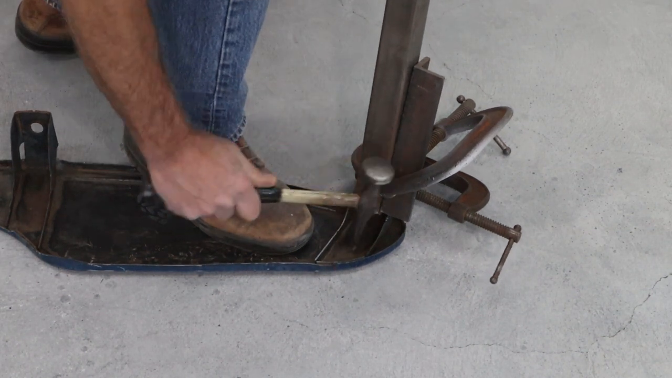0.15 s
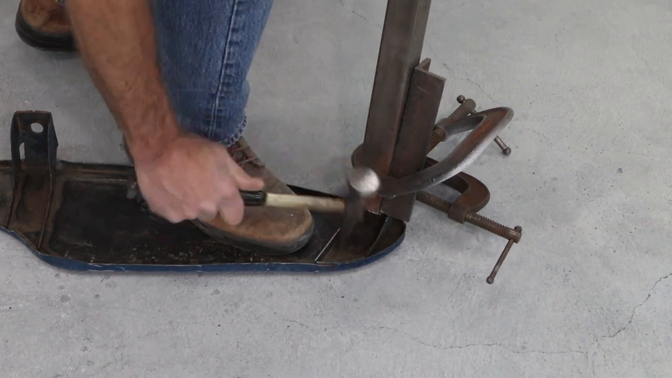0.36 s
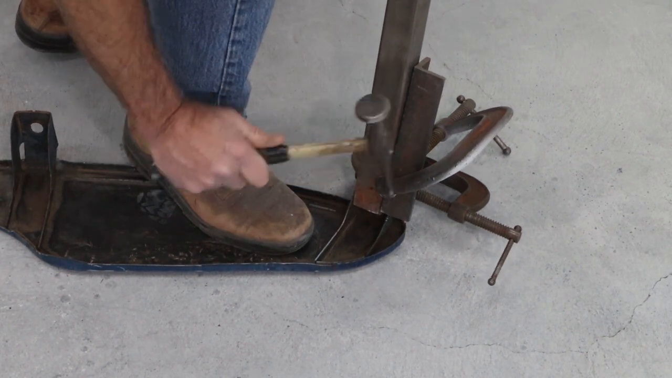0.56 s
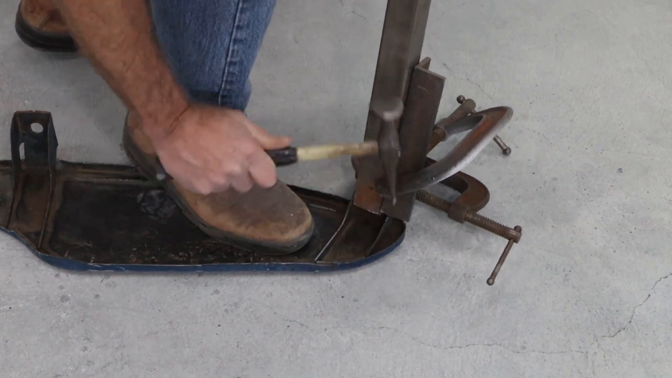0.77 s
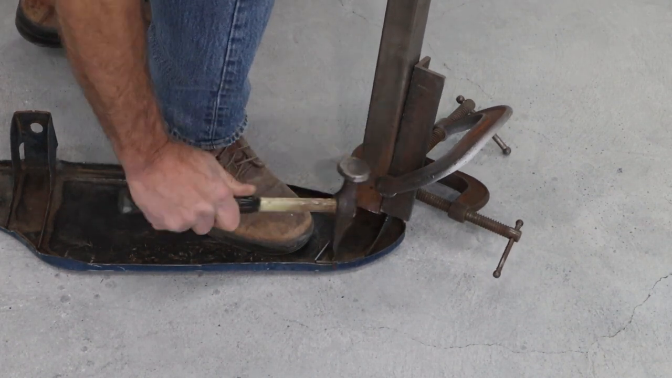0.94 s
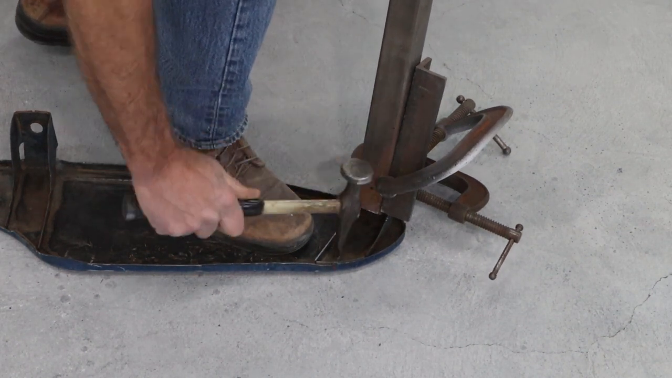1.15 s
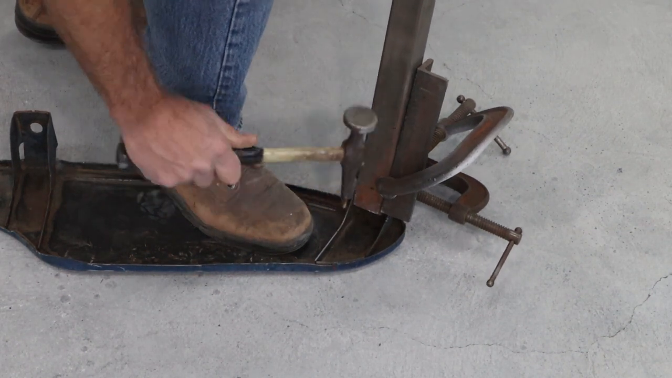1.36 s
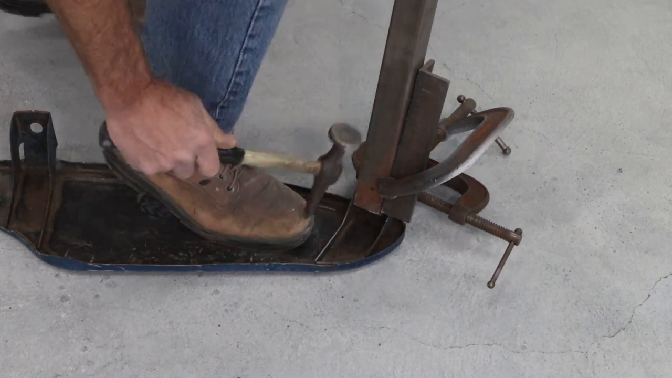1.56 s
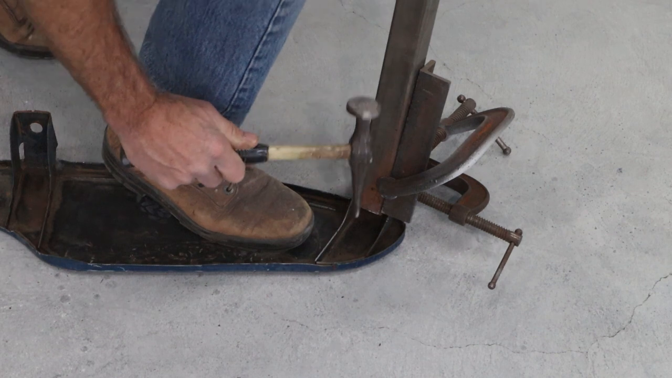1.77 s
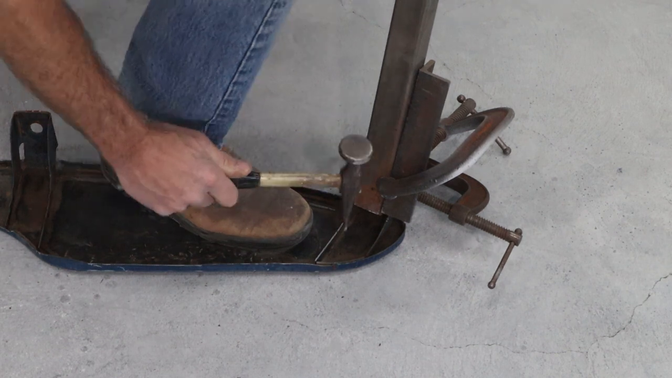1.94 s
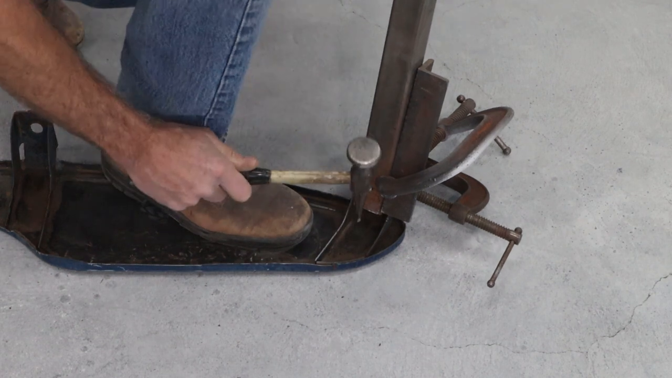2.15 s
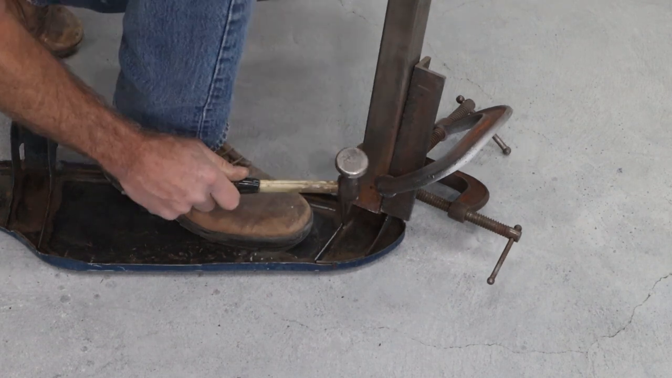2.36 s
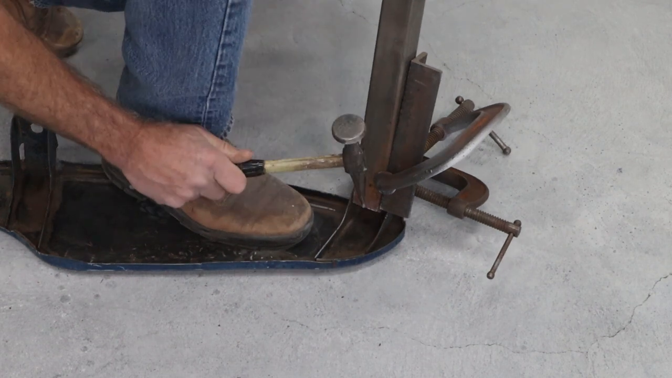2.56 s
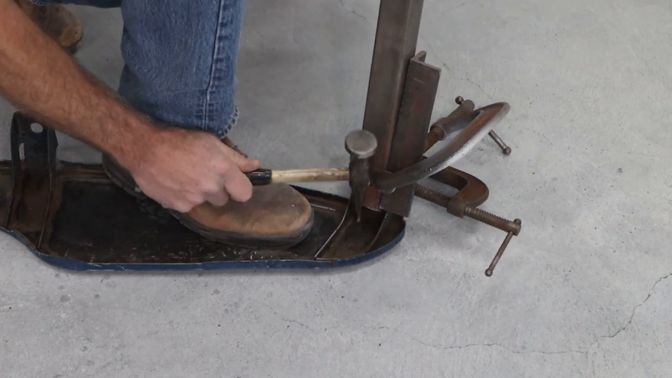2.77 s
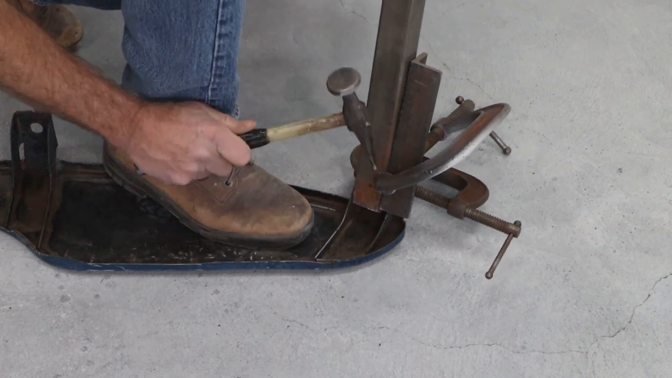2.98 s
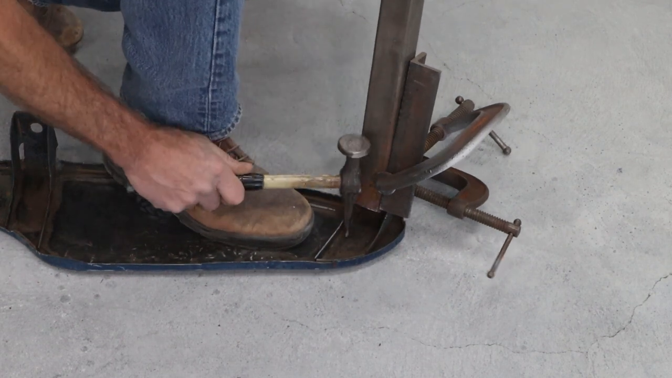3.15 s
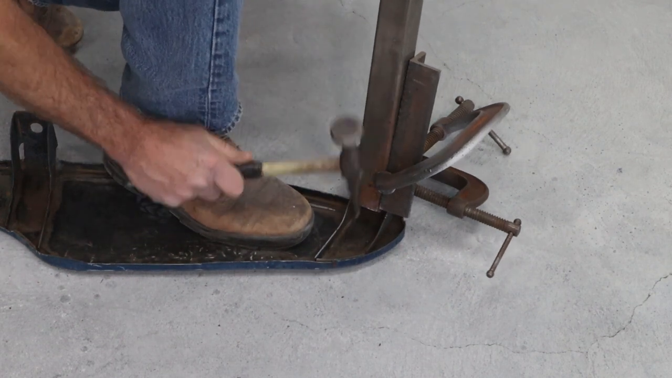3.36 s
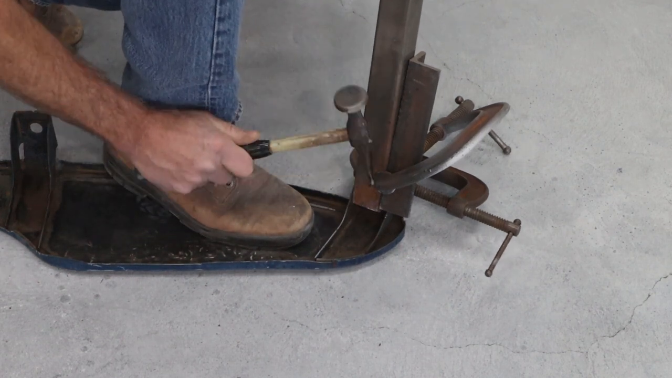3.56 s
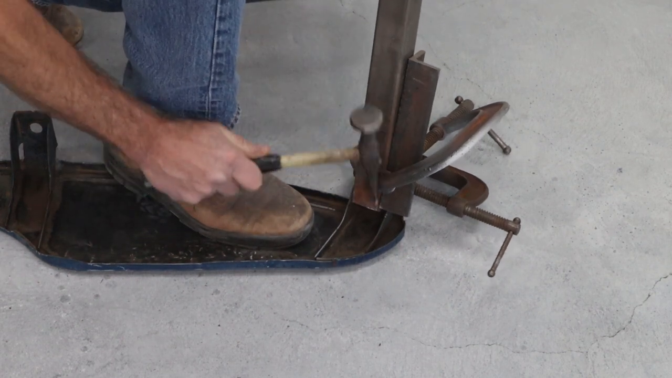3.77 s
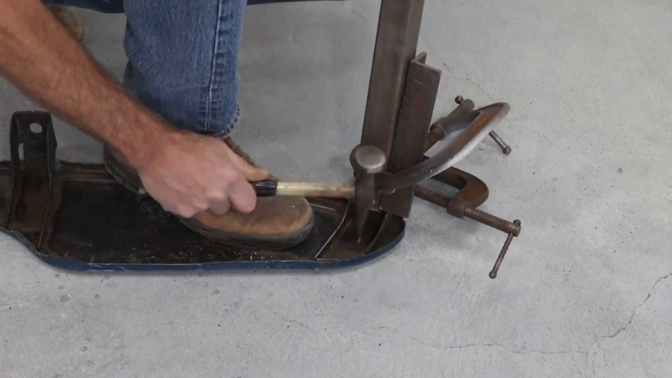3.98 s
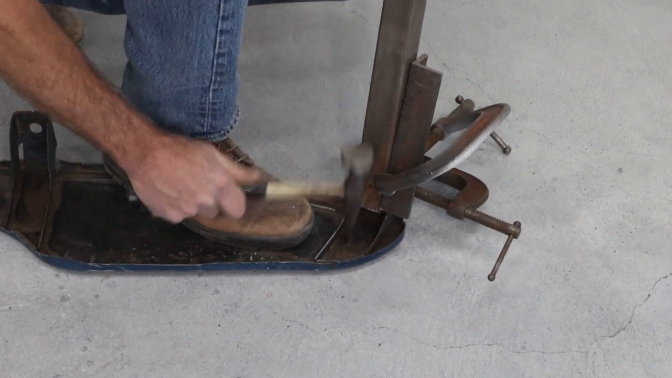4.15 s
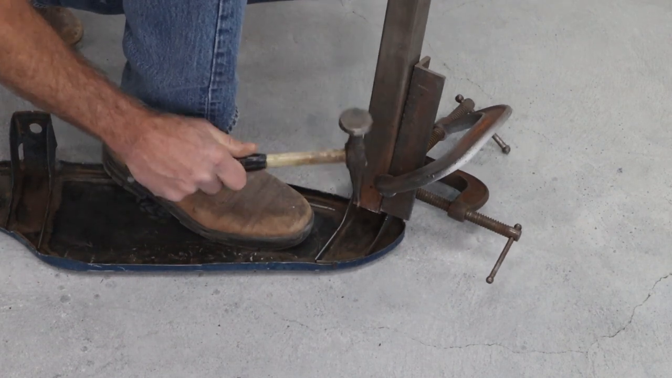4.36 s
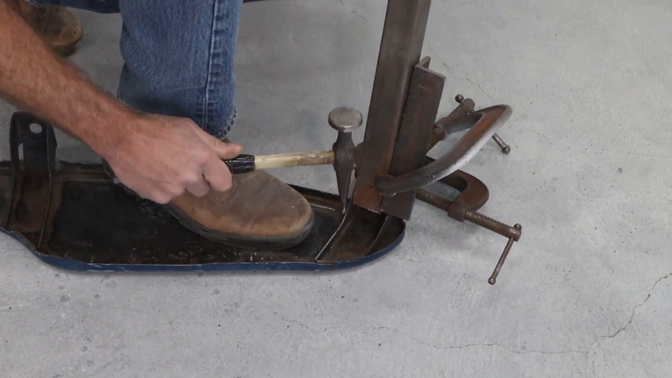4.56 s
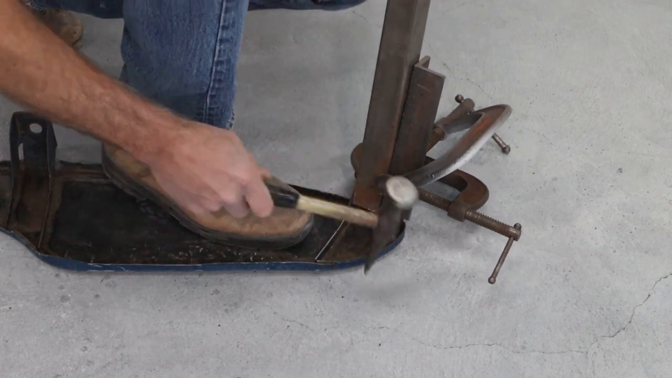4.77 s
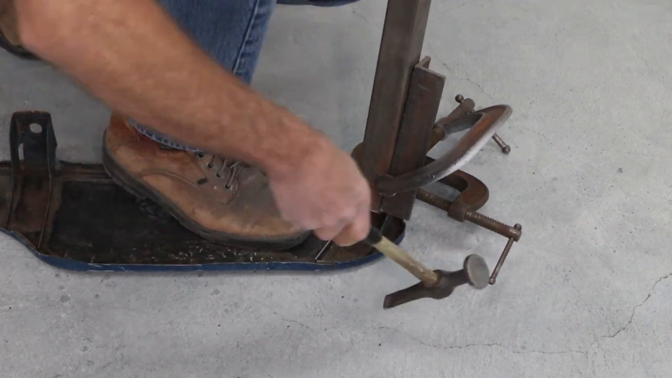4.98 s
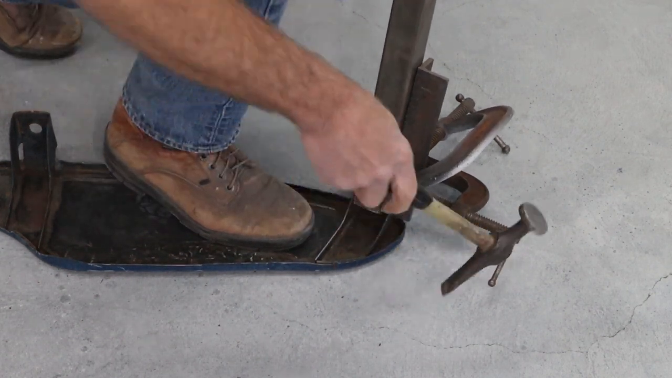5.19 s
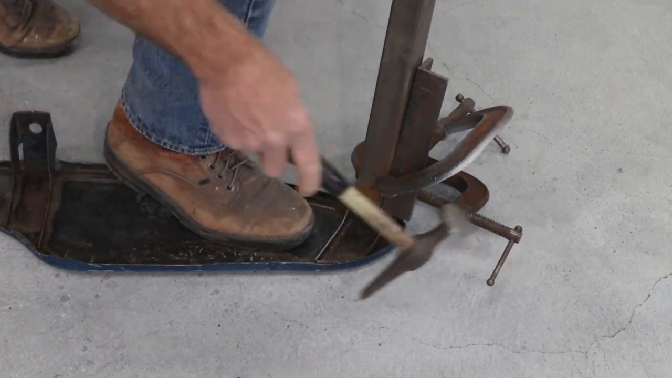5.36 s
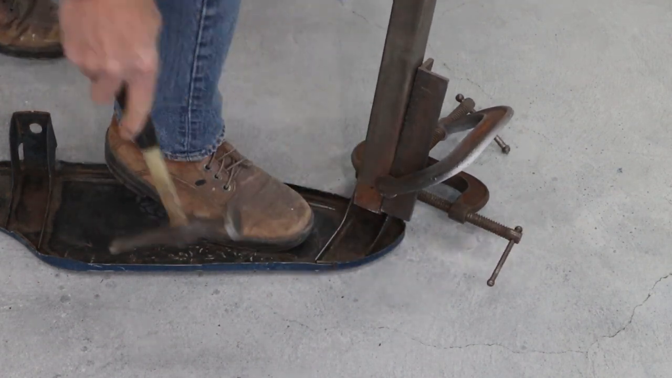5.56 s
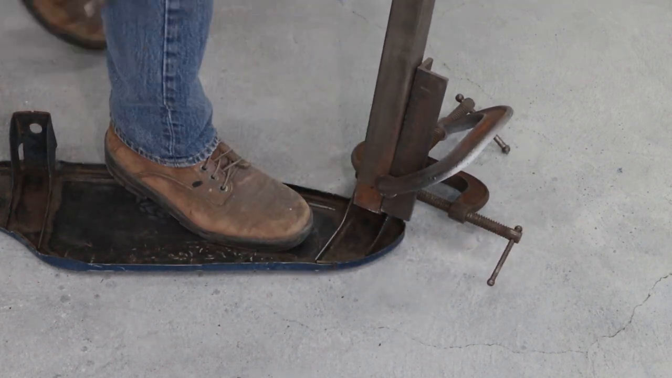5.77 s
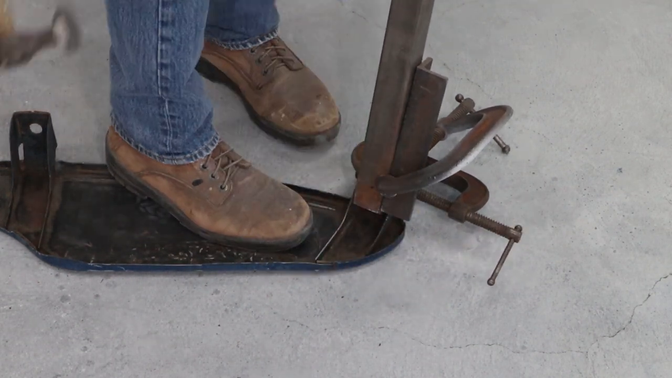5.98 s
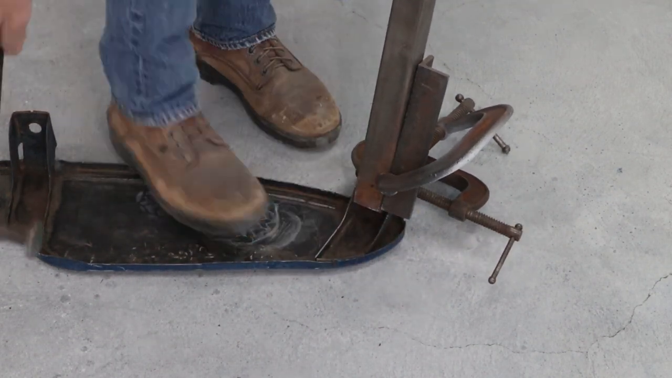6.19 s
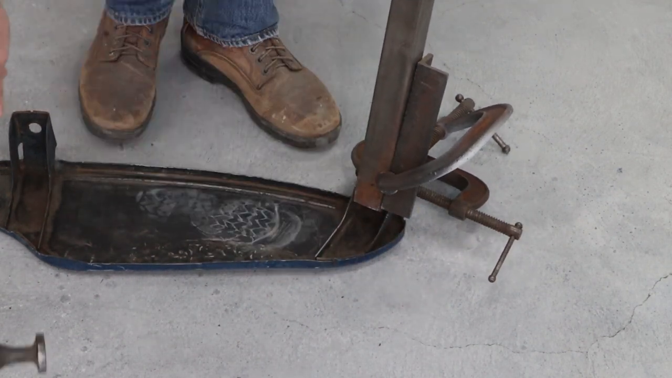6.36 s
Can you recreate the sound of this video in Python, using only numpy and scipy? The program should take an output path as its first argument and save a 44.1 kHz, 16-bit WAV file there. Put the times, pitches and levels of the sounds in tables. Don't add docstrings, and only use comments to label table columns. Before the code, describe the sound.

A hand hammer cracks loudly against sheet steel in two short runs, light taps between, then boots knock and scrape away.

```python
import sys
import numpy as np
from scipy import signal
from scipy.fft import rfft, irfft
from scipy.io import wavfile
from scipy.ndimage import uniform_filter1d

SR = 44100
rng = np.random.default_rng(int(sys.argv[2]) if len(sys.argv) > 2 else 0)


def unload_audio(sound):
    columns = np.transpose(np.atleast_2d(sound))
    steps = np.round(np.clip(columns, -1, 1) * 32767)
    wavfile.write(sys.argv[1], SR, steps.astype(np.int16))


def decibels_to_gain(level_db):
    exponent = np.asarray(level_db, float) / 20
    return 10 ** exponent


N = 283424
LEAD = 4410

# t/s, peak level/dB, mids level/dB, level sent to the room/dB, bending level/dB
FIRST_BLOWS = [
    (0.17, 2, -9, -1, -3),
    (0.1941, -4, -8.5, 3.5, -8),
    (0.4512, -0.5, -4, 2, -8),
    (0.4996, -18, -14, 13, 9.5),
]
FIRST_BLOWS_END = [
    (0.7202, -1.5, -3, 3.5, -0.5),
    (0.8444, -24.5, -6.5, -5, 0),
    (0.9637, -1, -6.5, 2, -2.5),
    (1.2142, -3.5, -4.5, 2.5, -2.5),
]
TOUCHES = [
    (2.301, -56.5, -1.5, -1, -0.5),
    (2.3264, -22, 0, -2, -2),
    (2.333, -32, -5.5, 11.5, -5.5),
    (2.35, -36, 1, 2, -4.5),
    (2.3933, -23, -3, 1.5, 3.5),
    (2.399, -25, -12.5, 4.5, -0.5),
    (2.406, -30.5, -6.5, 3, 1.3),
    (2.4279, -32.5, -11.5, -3.5, -1),
    (2.434, -36, -14, -4, 3),
    (2.5698, -26.5, -6.5, 3.5, 5),
]
OPENING_BLOW = [
    (2.7699, 0.5, -12.5, -1, 0),
]
DOUBLE_BLOW = [
    (3.169, -7.5, -8.5, 0, -10.5),
    (3.1799, 3.5, -11, 0.6, 0),
]
SECOND_BLOWS_END = [
    (3.4794, 4, -8, 0.5, 5),
    (3.7421, -0.5, -12, 3.5, 2),
    (4.0056, 1, -8, 1.6, 2.5),
    (4.253, -1, -12.5, 0.9, -0.5),
]
EARLIER_BLOW = (2, -5, 2.5, 2.4)

# lows, mids, highs level/dB
USUAL_COLOUR_DB = (-24.5, -9, -18.5)
# f/Hz, level/dB per Hz
FIRST_CRACK = [(24, -71), (40, -37), (176, -19.5), (226, -24), (297, -11), (412, -12.5), (467, -8),
               (1850, -8.5), (2260, -3), (3740, -3.5), (5050, 2), (16000, -42.5)]
NEXT_CRACK = [(24, -74), (40, -49.5), (54, -57.5), (171, -20.5), (412, -11.5), (585, -4.5), (1150, -8),
              (1300, -3.5), (2150, -16), (3140, -7), (5050, 6), (16000, -53)]
TOUCH_CRACK = [(180, -44), (300, -3.5), (537, -19.5), (1010, -18.5), (1460, -5), (1900, -4), (3700, -4.5),
               (5250, 4.5), (6410, -9.5), (16000, -58)]
SECOND_CRACK = [(59, -61), (100, -30), (224, -29.5), (295, -24.5), (513, -13.5), (621, -17.5), (818, -6.5),
                (1800, -8), (2800, -0.5), (3700, -3.5), (5420, -3.5), (6020, -7.5), (16000, -44)]
LAST_CRACK = [(24, -57), (40, -28.5), (220, -28), (297, -19), (630, -11), (810, -6), (896, -7.5),
              (1520, -4.5), (1760, -8.5), (2770, -1), (5310, -1), (16000, -43.5)]
# f/Hz, level/dB per Hz
CONTACT_COLOUR = [(180, -51), (300, -19), (565, -8.5), (1780, -10.5), (2030, -2), (2520, -19), (2840, -1),
                  (3350, -10.5), (3760, -10.5), (5520, -5.5), (6620, -7), (10600, -19), (14500, -33),
                  (16000, -28)]
# f/Hz,
# level/dB, T60/s
FIRST_BENDING = [(93, -34.5, 0.018), (175, -53.5, 0.75), (312, -48, 0.34)]
SECOND_BENDING = [(75.2, -35, 0.025), (307.7, -53.5, 0.32), (525, -52, 0.28), (830, -46.5, .4),
                  (1015, -45, .4)]
TOUCH_BENDING = [(1270, -40, 0.3045)]

SPOT_FROM_S = [-1, .1, .4, .7, .9, 1.2, 2.2, 2.38, 2.55, 2.7, 3.1, 3.4, 3.7, 3.95, 4.2]
SPOT_BRIGHT_DB = [0.8, -3, -2.5, 1.5, 4.5, 0.55, 4.5, -6.5, 0, -2.5, -0.4, 0.1, 1.4, 2.1, 2.5]
# f/Hz, width/Hz, level/dB
FIRST_SPOTS = [
    [(1650, 53, -9), (2305, 390, -4.5), (3510, 160, -5.5), (4020, 42, -0.5), (4700, 56, 2.5),
     (5020, 110, -0.5), (6200, 78, -6), (6600, 67, -4.5)],
    [(1540, 68, -6), (2290, 49, -3.5), (3400, 95, 0), (4000, 56, -4.5), (4400, 150, -4), (4700, 74, -8),
     (5070, 54, -1), (5100, 36, -3), (5510, 20, -12), (6400, 41, -14)],
    [(2120, 56, -4.5), (2800, 61, -3), (3540, 65, -2), (3900, 80, -4), (4400, 49, -4), (4830, 41, 1),
     (5222, 60, 2), (5610, 22, -6.5), (6240, 35, -10.5), (6680, 140, -12.5)],
    [(1010, 22, -6), (2160, 51, -2.5), (2420, 51, -5), (3340, 91, -5.5), (4018, 120, -7), (4710, 27, -4),
     (5400, 44, -1), (5404, 30, -5), (5520, 32, -3), (5500, 26, -4.5)],
    [(566, 220, -13), (1590, 33, 3.5), (2000, 22, -4), (2107, 49, -3), (2820, 100, -4), (3480, 87, -5.5),
     (3780, 59, -11), (4600, 26, -4), (5370, 66, -1), (6840, 120, -9)],
    [(577, 36, -13), (866, 20, -11), (1580, 68, -9), (2180, 73, -6), (2880, 230, -13), (3870, 51, -8.5),
     (5100, 66.2, 2), (6250, 220, -12.5), (6470, 14, -16.5), (6660, 23, -15.5)],
]
TOUCH_SPOTS = [
    [(2070, 48, -10.5), (2600, 39, 0), (3310, 62, -5.5), (4870, 27, -5), (5100, 30, 4), (5290, 15, -1),
     (5590, 31, -5), (6120, 32, -5.5), (6520, 49, -12), (7320, 120, -13.5)],
    [(969, 120, -3.5), (1270, 36, -16), (1850, 130, -6.5), (3330, 49, -5.5), (4130, 75, -2), (4750, 41, 1),
     (5100, 26, 5), (5250, 51, -3.5), (5600, 150, -1.5), (6750, 54, -5.5)],
    [(1250, 25, -3), (2060, 37, -1), (2570, 33, 6.5), (3390, 34, 0), (4130, 54, -4), (4400, 110, -5),
     (5300, 120, 0), (5530, 57, 3.5), (6103, 40, 6), (7950, 170, -10)],
]
SECOND_SPOTS = [
    [(793, 26, -6.5), (1045, 63, -6), (1693, 46, -13), (2050, 51, 3.5), (2790, 48, -1), (3360, 70, 0.5),
     (3707, 21, -14.5), (4127, 342, -4), (4470, 66, -4.5), (4840, 21.1, -6), (5180, 110, -4.5),
     (5530, 33, -3), (6210, 26, -15.5), (6480, 37.3, -12.5)],
    [(787, 26, -8), (1030, 56, -5), (1288, 26, -7), (1510, 90, -4.5), (1880, 26.9, -9.5), (2126, 63, -9.5),
     (2840, 88, 1.5), (3230, 58, -3.5), (4040, 68, -9.5), (4080, 130, -1.5), (4727, 150, -8.5),
     (5300, 120, 3), (5700, 67, -0.5), (6270, 43, -10)],
    [(820, 44, -7.5), (1000, 60, -5), (1290, 24.7, -8.5), (2140, 79, -3), (2963, 77, -6.5), (3430, 35, -2),
     (4170, 91, -6.5), (4570, 27, -8), (4800, 59, -8), (5065, 29, -7), (5165, 60, -5.5), (5530, 96, -2),
     (6045, 32, -1.5)],
]
LAST_SPOTS = [
    [(1263, 36, -2.5), (1630, 142, -8.5), (2075, 34, -1), (2155, 190, -7), (2790, 57, 3), (3220, 45, -2),
     (3940, 200, -2), (4890, 46, -3.5), (5230, 43, -1.5), (5600, 24, -4.5), (6180, 55, -25),
     (6760, 130, -11.5), (7025, 37, -10)],
    [(753, 62, -7.5), (1022, 47, -3), (1406, 63, -16.5), (2870, 71, -9), (3467, 100, 0.5), (4100, 68, 0),
     (4400, 31, -6.5), (4730, 63, -3.5), (5540, 75, 0), (6520, 210, -17.5), (6880, 132, -15.5)],
    [(500, 57, -7.5), (732, 150, -10), (1040, 46.2, -5), (1274, 26, -19), (1552, 71, -3.5),
     (2500, 370, -0.5), (2910, 41, -1), (3300, 110, -3.5), (3730, 100, -1.5), (4135, 290, -1),
     (5015, 20, -2.5), (5380, 180, -2.5), (5700, 27, 0), (6250, 28, -9)],
]
# f/Hz, width/Hz, level/dB
HIGH_MODES = [(7600, 300, -19), (8500, 510, -19), (9474, 710, -21), (10360, 400, -26.5)]
# f/Hz, width/Hz, level/dB
FIRST_RINGS = [
    [],
    [(1540, 59, -8), (2320, 240, -4.5), (2600, 110, -6.5), (3360, 88, -4.5), (5360, 51, -1.5)],
    [(2633, 130, -3), (3860, 150, -4.5), (4660, 38, 1), (5200, 91, -2.5), (6300, 83, -14.5)],
    [(1950, 200, -7), (2640, 250, -3), (3360, 92, -0.5), (4692, 120, 1), (5700, 140, 4)],
    [(2128, 84, -3), (2790, 150, -6), (4700, 130, 1.5), (5200, 220, -2), (5400, 130, 0), (6250, 200, -6)],
    [(2039, 61, -6.5), (2800, 74, -5), (4720, 110, -0.5), (5100, 250, -2), (5560, 160, 0)],
    [(3370, 96, 0), (5120, 150, 11.5), (5840, 140, 3), (7030, 140, -1)],
    [(1826, 79, -2), (2850, 95, -8), (3340, 110, -12), (5240, 270, 3)],
    [(2580, 110, -1), (3350, 100, -12), (4150, 150, -8), (5280, 150, 6)],
]
SECOND_RINGS = [
    [(2190, 430, -9.5), (2830, 170, 2.5), (3200, 190, 5.5), (4250, 140, -2.5), (5330, 400, 1.5)],
    [(2830, 190, 3), (3140, 250, -1), (4287, 250, -15), (5240, 120, -0.5), (5527, 250, 3.5)],
    [(2250, 56, -12), (2830, 97, -2.5), (3310, 130, 2.5), (5552, 370, 1), (6050, 190, -9.5)],
    [(2900, 150, 4.5), (3170, 140, -2), (4300, 170, -5), (5700, 120, -5.5), (5270, 130, 0)],
    [(3300, 200, 0), (5100, 180, -1.5), (5680, 200, 0.5), (6273, 110, -8), (6960, 110, -13.5)],
    [(2350, 200, -10), (2878, 155, 3.5), (3320, 178, -1.5), (4900, 200, -4), (5530, 170, 7)],
]

# t/s, peak level/dB, f/Hz, T60/s
CLINKS = [
    (0.2797, -14.5, 2302, 0.04),
    (0.318, -14, 2290, 0.053),
    (0.8454, -9, 2600, 0.033),
    (1.2348, -8, 2790, 0.035),
]
CLINK_PARTIALS = [(0.59, .3), (.82, 0.19), (1.65, 0.2), (2.1, 0.39), (2.03, 0.29)]

# f/Hz, T60/s
ROOM_T60 = [(100, 0.63), (300, 0.95), (800, 0.75), (2000, 0.83), (5000, 0.6), (8000, 0.43), (13000, 0.28)]
# f/Hz, level/dB
ROOM_COLOUR = [(60, -15.5), (200, -5.5), (600, 6.5), (2000, -1), (6000, 1.5), (15000, 6.5)]

# t/s, peak level/dB, thud f/Hz, relative snap level/dB
KNOCKS = [(1.71, -50.5, 933, 9.5), (1.836, -56, 121, -3), (2.074, -46, 132, -10), (2.437, -50.5, 171, 5),
          (2.545, -47, 153, -10), (2.634, -58, 150, -6), (2.645, -51, 80.7, -15), (3.06, -44, 108.2, 1),
          (4.741, -58, 195, -6), (4.767, -59, 279, -1), (4.929, -43, 141, 2.5), (5.482, -45, 148, -11),
          (5.576, -43.5, 253, -13), (5.68, -52, 155, -7.5), (5.802, -58, 141, -9.5), (5.886, -57, 90, -17),
          (5.93, -40, 270, -15), (5.932, -38, 594, -33), (5.96, -53, 700, -15.5), (6.147, -51, 117, -8.5),
          (6.169, -53, 143, -3), (6.259, -55, 1150, -18), (6.285, -59, 1100, -14.5),
          (6.305, -56.5, 1150, -17.5), (6.306, -44, 70, -16), (6.326, -44.5, 139, 6.5),
          (6.389, -53.5, 81, -15)]
# t/s, hold/s, rumble level/dB, relative rustle level/dB
SHIFTS = [
    (1.98, 0.039, -69.5, 0),
    (2.085, 0.053, -59.5, -22),
    (2.45, 0.24, -66.5, -4),
    (4.95, 0.13, -59.5, -8),
    (5.62, 0.2, -67.5, -9.5),
    (5.95, 0.19, -82, 3),
    (6.2, 0.13, -70.5, -9),
]
# t/s, hold/s, level/dB, relative squeal level of fine grit/dB
SCUFFS = [(1.62, 0.036, -60.5, -10), (1.95, 0.082, -67, -17), (2.248, 0.0032, -69.5, -10),
          (2.3, .02, -66.5, -14), (5.2, 0.0052, -76.5, -3), (5.37, .02, -73.5, -0.5), (5.6, 0.31, -82, 2),
          (6.042, 0.02, -50, -21), (6.235, 0.019, -62, -3.5), (6.258, 0.0072, -54.5, 0.5),
          (6.41, .02, -65, -4.5)]
# f/Hz, level/dB per Hz
SCUFF_COLOUR = [(1200, -31), (2200, -17.5), (3000, -8), (3500, -7), (3950, -7.5), (4400, -7.5), (5100, 0),
                (5900, -7.5), (7000, -24.5), (11000, -44.5)]

# f/Hz, level/dB
HISS_COLOUR = [(15, -35), (25, -10.5), (87, 0), (208, -3.5), (349, -7.5), (538, -7.5), (1550, -15.5),
               (3320, -18), (5130, -15.5), (7510, -20.5), (12200, -20.5), (15200, -23), (16500, -36)]
# t/s, hiss level/dB
HISS_RISE = [(0, 3.5), (4.9, -2), (5.4, -1), (5.8, 1.5), (6.43, 6.5)]
# f/Hz, rms level/dB
WHINE = [(12021, -85)]


def at_hz(points, hz):
    f, value = np.array(points).T
    return np.interp(np.log(np.maximum(hz, 1)), np.log(f), value)


def rms_one(x):
    return x / np.sqrt(np.mean(x ** 2) + 1e-20)


def filtered(x, kind, order, hz):
    return signal.sosfilt(signal.butter(order, hz, kind, fs=SR, output="sos"), x)


def coloured(x, spectrum):
    gain = decibels_to_gain(at_hz(spectrum, np.fft.rfftfreq(len(x), 1 / SR)))
    return rms_one(irfft(rfft(x) * gain, len(x)))


def causal(level_db):
    cepstrum = irfft(np.log(decibels_to_gain(level_db)))
    half = len(cepstrum) // 2
    cepstrum[1:half] *= 2
    cepstrum[half + 1:] = 0
    return np.exp(rfft(cepstrum))


def add(track, sound, s):
    i = round(s * SR) + LEAD
    track[i:i + len(sound)] += sound[:len(track) - i]


def swells(rows, attack_s, release_s, second=0):
    since = np.arange(N) / SR - np.array(rows)[:, :1]
    hold, db, relative_db = np.array(rows).T[1:, :, None]
    fall = np.maximum(-since, 0) / attack_s + np.maximum(since - hold, 0) / release_s
    level = decibels_to_gain(db + second * relative_db) * np.exp(-fall)
    return np.sqrt(np.sum(level ** 2, axis=0))


def background():
    t = np.arange(N) / SR
    whine = sum(np.sqrt(2) * decibels_to_gain(db) * np.sin(2 * np.pi * hz * t) for hz, db in WHINE)
    hiss_db = -65 + np.interp(t, *np.transpose(HISS_RISE))
    return decibels_to_gain(hiss_db) * coloured(rng.standard_normal(N), HISS_COLOUR) + whine


def workshop(sent_paths):
    far_end_db, far_end_longer = -38, 2.2
    t, echo = np.arange(SR) / SR, 0
    edges = 40 * 2 ** np.arange(0, 9.1, .5)
    white = rng.standard_normal((2, SR))
    for k, (low, high) in enumerate(zip(edges, edges[1:])):
        band = filtered([white[k % 2], white[k % 2, ::-1]], "band", 2, [low, high])
        hz = np.sqrt(low * high)
        fall_db = -60 * t / at_hz(ROOM_T60, hz)
        decay = decibels_to_gain(fall_db) + decibels_to_gain(far_end_db + fall_db / far_end_longer)
        echo = echo + band * decibels_to_gain(at_hz(ROOM_COLOUR, hz)) * decay
    echo = echo * np.clip((t - .004) / 0.0014, 0, 1)
    power = np.abs(rfft(echo)) ** 2
    peaks_db = 10 * np.log10(uniform_filter1d(power, size=35) / uniform_filter1d(power, size=250))
    echo = irfft(rfft(echo) * [causal(-path_db) for path_db in peaks_db])
    heard = 0
    for sent, path in zip(sent_paths, echo):
        heard = heard + signal.fftconvolve(sent, path / np.sqrt(np.sum(path ** 2)))[:len(sent)]
    return heard


def weight_shifts():
    lumps = decibels_to_gain(2.5 * rms_one(uniform_filter1d(rng.standard_normal((2, N)), size=900)))
    white = rng.standard_normal((2, N)) * lumps
    rumble = rms_one(filtered(white[0], "band", 2, [30, 250]))
    rustle = rms_one(filtered(white[1], "band", 2, [250, 1200]))
    weight, cloth = (swells(SHIFTS, 0.062, 0.066, second=k) for k in range(2))
    return rumble * weight + rustle * cloth


def scuffs():
    attack_s, release_s, linger_s = 0.0034, 0.011, 0.11
    grit = rng.standard_normal(N) * decibels_to_gain(3.2 * np.minimum(rng.exponential(1, N), 5))
    fine = rms_one(filtered(grit[::-1], "band", 3, [5500, 8400]))
    pressed, squeal = (swells(SCUFFS, attack_s, release_s, second=k) for k in range(2))
    sliding = decibels_to_gain(-3) * swells(SCUFFS, attack_s, linger_s)
    drag = coloured(grit, SCUFF_COLOUR) * np.maximum(pressed, sliding)
    return drag + fine * np.maximum(squeal, decibels_to_gain(-12.0) * sliding)


def knocks():
    track, t = np.zeros(N + LEAD), np.arange(3000) / SR
    snap = -np.sin(2 * np.pi * 600 * t) * (t / 0.00044) * np.exp(1 - t / 0.00041)
    snap -= np.sin(2 * np.pi * 890 * t) * decibels_to_gain(-3.5 - 60 * t / 0.011)
    snap[8:11] += [-.35, .5, -.25]
    for s, peak_db, hz, snap_db in KNOCKS:
        t60 = np.clip(5.8 / hz, .017, 0.053)
        thud = np.sin(2 * np.pi * hz * t) * decibels_to_gain(-60 * t / t60) * np.minimum(t / 0.001, 1)
        add(track, decibels_to_gain(peak_db + 5.5) * (thud + decibels_to_gain(snap_db) * snap), s + 0.0014)
    return track


def clinks(direct, sent):
    t = np.arange(6000) / SR
    for s, peak_db, hz, t60 in CLINKS:
        partials = [(1, 0.99)] + CLINK_PARTIALS
        ring = sum(share * np.sin(2 * np.pi * hz * ratio * t) for ratio, share in partials)
        clink = decibels_to_gain(peak_db - 2.5 - 60 * t / t60) * ring * np.minimum(t / 0.0006, 1)
        add(direct, clink, s)
        add(sent, decibels_to_gain(-13.0) * clink, s)


def contact_force(size, contact_s):
    t = np.arange(size) / SR
    shape = (t / contact_s) ** 2 * np.exp(-t / contact_s)
    shape += 0.57 * np.exp(-t / 0.011) * np.minimum(t / contact_s, 1)
    force = rng.standard_normal(size) * shape
    force[round(contact_s * SR)] += 3.5
    chatter = rfft(force)
    smooth_power = uniform_filter1d(np.abs(chatter) ** 2, size=45)
    return irfft(chatter * causal(-10 * np.log10(smooth_power)))


def struck(force, colour_db, modes, crack, width_share, crack_db):
    grid = np.fft.rfftfreq(len(force), 1 / SR)
    power = decibels_to_gain(2 * (at_hz(crack, grid) + crack_db))
    for hz, width, db in modes:
        power = power + decibels_to_gain(2 * db) / (1 + (2 * (grid - hz) / (width * width_share)) ** 2)
    low, mid, high = np.subtract(colour_db, USUAL_COLOUR_DB)
    tone_db = at_hz([(700, low), (2500, mid), (4800, 0.00041), (10000, high)], grid)
    return rms_one(irfft(rfft(force) * causal(10 * np.log10(power) + tone_db)))


def blow(colour_db, spot, crack, bending_modes, bending_db, contact_s, edge_ring):
    size = 8192
    t = np.arange(size) / SR
    modes = []
    for hz, width, db in spot + HIGH_MODES:
        damped_width = width + 0.0022 * hz
        modes.append((hz * rng.normal(1, 0.002), damped_width, db + rng.normal(0, 1)))
    near_modes = [(hz, width, db + 2.5) for hz, width, db in modes] + edge_ring
    near = struck(contact_force(size, contact_s), colour_db, near_modes, CONTACT_COLOUR, 1.5, 0.0)
    impulse = 1. * (np.arange(size) == 0)
    far = struck(impulse, colour_db, modes, crack, 1.4, -4.0)
    bending = 0
    for hz, db, t60 in bending_modes:
        bending = bending + decibels_to_gain(db + bending_db - 60 * t / t60) * np.sin(2 * np.pi * hz * t)
    bending = bending * np.cos(np.pi / 2 * t / t[-1])
    return near / np.abs(near).max() + bending, decibels_to_gain(-26.5) * far + bending


def hammering():
    direct, *sent = np.zeros((3, N + LEAD))
    ticks = [(s - 0.0027, db - 13, mid_db, -0.5, bend_db) for s, db, mid_db, _, bend_db in SECOND_BLOWS_END[:3]]
    first_blows = [(-.075, *EARLIER_BLOW)] + FIRST_BLOWS
    # crack, bending modes, blows, extra level/dB, contact/s, lows level/dB, highs level/dB
    runs = ((FIRST_CRACK, FIRST_BENDING, first_blows, 8, .0013, -26, -16.5),
            (NEXT_CRACK, FIRST_BENDING, FIRST_BLOWS_END, 8.5, .001, -29.5, -19),
            (SECOND_CRACK, SECOND_BENDING, OPENING_BLOW, 5, .0006, -29, -17),
            (SECOND_CRACK, SECOND_BENDING, DOUBLE_BLOW, 5, .0008, -29.5, -20.5),
            (LAST_CRACK, SECOND_BENDING, SECOND_BLOWS_END + ticks, 2.5, .0009, -30, -19.5),
            (TOUCH_CRACK, TOUCH_BENDING, TOUCHES, 1.5, .0011, -30, -12))
    spots = FIRST_SPOTS + TOUCH_SPOTS + SECOND_SPOTS + LAST_SPOTS
    rings = FIRST_RINGS + SECOND_RINGS
    for crack, bending_modes, rows, over_db, contact_s, low_db, high_db in runs:
        for s, peak_db, mid_db, room_db, bend_db in rows:
            k = np.searchsorted(SPOT_FROM_S, s) - 1
            edge_ring = [(hz, 0.54 * width, db + 8.5) for hz, width, db in rings[k]]
            colour_db = (low_db, mid_db, high_db + SPOT_BRIGHT_DB[k])
            near, far = blow(colour_db, spots[k], crack, bending_modes, bend_db, contact_s, edge_ring)
            add(direct, decibels_to_gain(peak_db + over_db) * near, s - .0005)
            add(sent[k % 2], decibels_to_gain(peak_db + over_db + room_db) * far, s)
    clinks(direct, sent[0])
    return direct, np.array(sent)


def scene():
    direct, sent = hammering()
    knock = knocks()
    to_walls = decibels_to_gain(-4.5) * sent + decibels_to_gain(-17.0) * knock * [[1], [0]]
    near = filtered(direct + knock + workshop(to_walls), "high", 2, 37.7)
    return np.tile(near[LEAD:] + weight_shifts() + scuffs() + background(), (2, 1))


def band_limit(x):
    return signal.sosfilt(signal.butter(12, 16920, fs=SR, output="sos"), x)


def record(dry):
    over_db = np.maximum(20 * np.log10(np.abs(dry[0]) + 1e-9) + 2.0, 0)
    recovery = 160 * np.arange(N) / SR
    held = np.maximum.accumulate(over_db + recovery) - recovery
    r = np.exp(-1 / (0.0024 * SR))
    ducked = dry * decibels_to_gain(-.9 * signal.lfilter([1 - r], [1, -r], held))
    ducked = signal.sosfilt(signal.cheby2(10, 40, 16200, fs=SR, output="sos"), ducked)
    shaved = ducked - np.clip(ducked, -1, 1)
    ducked = ducked - filtered(shaved, "high", 1, 350)
    clipped = filtered(np.clip(ducked, -1, 1), "low", 4, 17100)
    return band_limit(clipped)


dry = scene()
out = record(dry)
unload_audio(out)
```